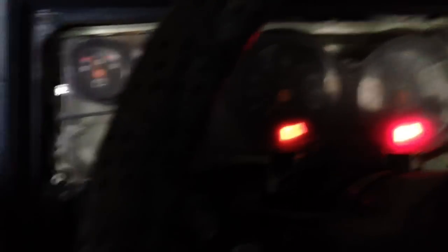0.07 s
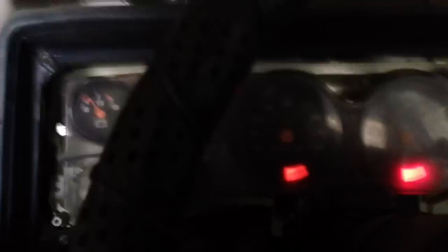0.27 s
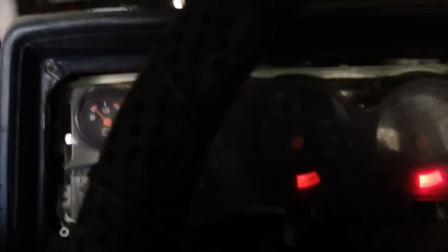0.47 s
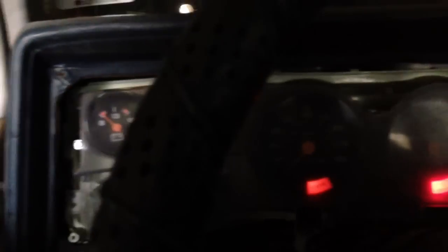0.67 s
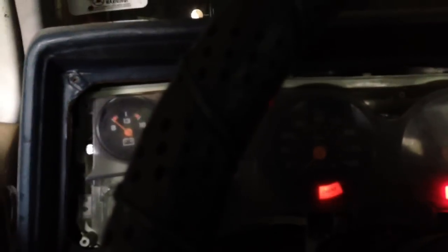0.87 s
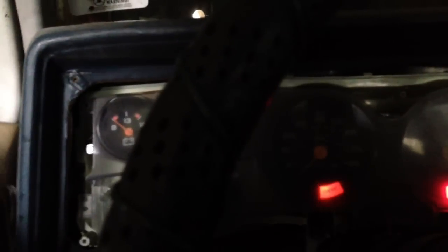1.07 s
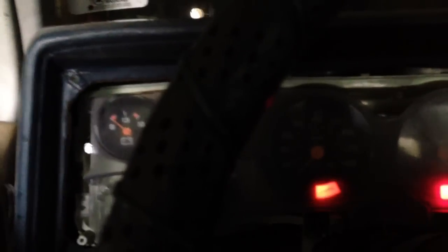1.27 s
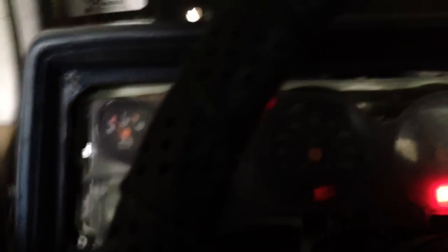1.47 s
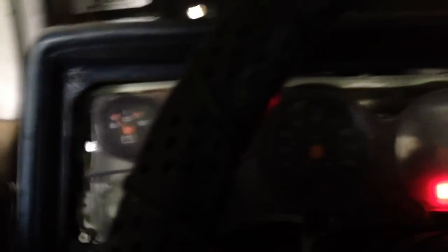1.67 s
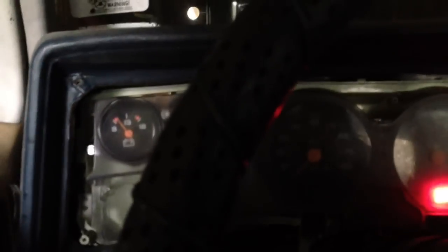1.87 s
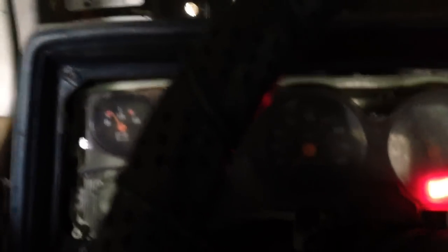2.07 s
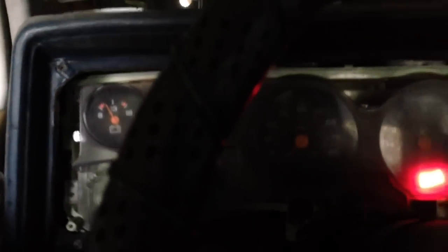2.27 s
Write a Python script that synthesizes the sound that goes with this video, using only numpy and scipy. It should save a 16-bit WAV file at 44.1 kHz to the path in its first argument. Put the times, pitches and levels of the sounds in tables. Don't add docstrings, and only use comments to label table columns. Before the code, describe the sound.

A car starter cranks a large engine, heard inside the cabin. Faint key clicks at 0.06-0.15 s end in a sharp snap. From 0.2 to 1.45 s, harsh ringing gear grind surges irregularly, with low hum, clangs and short groans, hardest near 1.0 and 1.36 s. The engine catches around 1.5 s, flares at 1.8-1.95 s with exhaust boom, intake hiss and panel buzz, then sags quieter. Dry, close, little bass.

```python
import sys
import numpy as np
from scipy import signal
from scipy.fft import rfft, irfft, next_fast_len
from scipy.io import wavfile
from scipy.ndimage import uniform_filter1d, map_coordinates

SR = 44100
rng = np.random.default_rng(int(sys.argv[2]) if len(sys.argv) > 2 else 0)


def materialize(psi):
    bounded = np.clip(np.atleast_2d(psi).T, -1, 1)
    quanta = np.round(bounded * 32767).astype(np.int16)
    wavfile.write(sys.argv[1], SR, quanta)


def nominal_scale(level):
    x = np.asarray(level, float) / 20
    return 10 ** x


N = 101430

# frequency in Hz, level in dB.
CABIN_AIR = [(35, -58), (60, -31), (100, -2), (145, 7), (976, -30), (1070, -18), (1910, -20), (15500, -31)]
# start in seconds, peak in dB, ring in Hz, crack in dB, 60 dB decay in seconds.
KEY_CLICKS = [
    (.059, -47, 3100, -2, .015),
    (.078, -45.5, 1700, 3.5, 0.083),
    (.083, -52, 3180, -6, .05),
    (.099, -30.5, 797, -17, 0.073),
    (.104, -36, 1820, -11, 0.029),
    (.125, -38, 2180, 6, 0.06),
    (.135, -20, 4000, 7.5, 0.018),
    (.138, -20, 796, -20, 0.034),
    (.151, -44.5, 5720, 16, 0.038),
]
# peak in seconds, level in dB, then the rise and the fall,
# each in seconds for 20 dB.
STROKES = [(.22, -30, .03, .06), (0.239, -20.5, 0.027, 0.16), (.32, -12, 0.12, 0.14),
           (.44, -16.5, 0.15, 0.28), (0.539, -14.5, 0.77, 0.19), (0.72, -12.5, 0.19, 0.18),
           (.88, -12.5, 0.14, 0.15), (0.992, -9.5, 0.0081, 0.15), (1.09, -15, .015, 0.085),
           (1.135, -12.5, 0.11, 0.098), (1.268, -21.5, 0.065, 0.038), (1.362, -10, 0.0089, 0.076),
           (1.469, -17.5, 0.14, 0.075)]
# frequency in Hz, width in Hz, level in dB.
FLYWHEEL_MODES = [(1333, 28, -8), (1776, 84, 0), (1902, 69, 4.5), (2061, 48, 1), (2223, 70, -2.5),
                  (2570, 53, -5.5), (2720, 73, -0.5), (3220, 45, -6), (3743, 70, 1.5), (4490, 89, -2),
                  (4820, 93, -2), (5270, 49, -5), (5750, 55, -3), (6380, 76, -5)]
# frequency in Hz, level in dB.
SCRAPE_SPECTRUM = [(150, -60), (350, -17), (750, -13), (1300, -8), (2500, -2.5), (5530, -3.5),
                   (11300, -20.5), (15500, -33)]
# frequency in Hz, width in Hz, level in dB.
BODY_MODES = [(175, 97, -1), (290, 140, -1), (483, 66, -0.5), (675, 140, -9.5)]
# time in seconds, pitch in Hz, level in dB.
ARMATURE = [
    (.23, 230, -35),
    (.255, 267, -40.5),
    (0.298, 175, -24),
    (.345, 192, -42.5),
    (.41, 225.7, -37),
    (0.519, 263, -32),
    (.565, 177, -24),
    (.605, 169.7, -28.5),
    (0.639, 175, -24),
    (0.689, 189, -45),
]
# centre in seconds, length in seconds, pitch in Hz,
# level in dB.
CLANGS = [(.238, 0.013, 6100, -30), (.238, 0.015, 7200, -32), (.3, 0.05, 1700, -25), (.312, .02, 4585, -21),
          (.31, .04, 4950, -24), (.33, .015, 3850, -22), (.335, .025, 2660, -17), (.355, 0.02, 2640, -17),
          (.355, .02, 2080, -22), (.37, .02, 2230, -22), (.385, .025, 2620, -20), (.41, .04, 1350, -27),
          (.42, .05, 5270, -23), (.445, .03, 2640, -23), (.47, .04, 2070, -23), (.5, .04, 4950, -23),
          (.52, .03, 1850, -22), (.57, .04, 2600, -22), (.61, .05, 3720, -24), (.625, .025, 1354, -27),
          (.688, .02, 1860, -21), (.7, .03, 4990, -23), (.72, .025, 4250, -22), (.745, .035, 3246, -20),
          (.755, .03, 2580, -22), (.87, .035, 4713, -23), (.9, .03, 2685, -23), (.905, .02, 5076, -22),
          (.992, 0.017, 1745, -18), (1.0, 0.025, 1350, -23), (1.002, 0.015, 3243, -17),
          (1.005, .035, 3745, -20), (1.01, .025, 2075, -21), (1.005, .02, 2600, -19),
          (1.025, 0.015, 2654, -14), (1.053, .015, 3740, -22), (1.058, 0.025, 2680, -19),
          (1.11, 0.03, 2670, -20), (1.122, .015, 1745, -19), (1.14, 0.032, 2060, -17),
          (1.165, 0.035, 1620, -24), (1.362, 0.025, 1740, -17), (1.372, .03, 3240, -16),
          (1.37, .015, 4430, -20), (1.39, 0.035, 2680, -17)]
# centre in seconds, length in seconds, pitch in Hz,
# level in dB.
GROANS = [(.725, 0.038, 299, -31), (0.738, 0.049, 515, -31), (0.763, 0.026, 200, -28), (.81, .03, 215, -31),
          (0.87, 0.018, 330, -22.5), (.885, 0.055, 477, -34), (.89, 0.036, 677, -32),
          (0.916, 0.019, 294, -24), (.93, 0.047, 573, -35), (.995, 0.04, 290, -34.5),
          (1.0, 0.038, 466, -31), (1.012, 0.025, 191, -33.5), (1.12, 0.042, 164, -34.5),
          (1.168, 0.067, 333, -32.5), (1.29, 0.05, 85, -42), (.25, 0.022, 491, -31),
          (.5, 0.032, 517, -32.5), (.62, 0.047, 489.5, -33)]
# time in seconds, firings per second, effort in dB, share of clean boom in dB.
ENGINE_COURSE = [
    (1.197, 113, -53, -3),
    (1.5, 65.3, -32.5, -27.5),
    (1.719, 73, -28, -1.5),
    (1.815, 79, -17.5, 2.5),
    (1.889, 95, -17.5, -15),
    (1.964, 92, -22.5, -19),
    (1.998, 94, -28, -7),
    (2.12, 88, -33, -2),
    (2.3, 72, -37, 3.5),
]
# frequency in Hz, width in Hz, level in dB.
EXHAUST_MODES = [(85, 91, -7), (167, 70, 1), (290, 142, -8), (455, 16, -1), (594, 280, -17.5),
                 (922, 33, -12), (1053, 37, -15.5)]
# frequency in Hz, level in dB.
VALVE_SPECTRUM = [(350, -35), (600, -11), (1120, -13), (1640, -9.5), (2570, -13.5), (6000, -19),
                  (15500, -49)]
# frequency in Hz, width in Hz, level in dB.
PANEL_MODES = [(1540, 136, -15), (2194, 79, 1.5), (2530, 190, 2.5), (2844, 84, 4)]
# frequency in Hz, level in dB.
INTAKE_SPECTRUM = [(590, -4.5), (1000, -20), (1690, -11), (2280, -8.5), (3260, -9.5), (12900, -19),
                   (15500, -24.5)]
# time in seconds, level in dB.
THROTTLE = [
    (1.45, -21),
    (1.62, -7.5),
    (1.66, -11),
    (1.755, -3.5),
    (1.935, -2.5),
    (2.0, -21.5),
    (2.3, -30),
]
# centre in seconds, length in seconds, pitch in Hz, level in dB.
BUZZES = [(1.65, 0.077, 1050, -38), (1.646, .016, 2251, -32), (1.648, .016, 2581, -36),
          (1.668, 0.02, 2291, -31), (1.69, 0.04, 2471, -39), (1.775, 0.025, 2781, -33),
          (1.795, .045, 2276, -29), (1.79, .02, 2601, -32), (1.82, .03, 2501, -33),
          (1.818, .015, 2151, -32), (1.85, 0.21, 1050, -36), (1.87, .04, 2251, -32),
          (1.862, .04, 2850, -27), (1.892, 0.05, 2820, -25), (1.9, .02, 2257, -32),
          (1.935, .035, 2741, -28), (1.955, .02, 2151, -34), (1.965, 0.04, 2840, -29),
          (1.88, 0.023, 1541, -34), (2.025, .02, 2881, -38)]


def unit(x):
    return x / np.sqrt(np.mean(x ** 2) + 1e-20)


def clock():
    return np.arange(N) / SR


def wobble(rate, size=N):
    knots = rng.standard_normal(int(N * rate / SR) + 4)
    return map_coordinates(knots, [np.arange(size) * rate / SR])


def filtered(x, response):
    m = next_fast_len(N + SR // 2)
    return irfft(rfft(x, m) * response(np.fft.rfftfreq(m, 1 / SR)), m)[:N]


def coloured(x, points):
    f, db = np.transpose(points)
    return unit(filtered(x, lambda hz: nominal_scale(np.interp(np.log(hz + 1), np.log(f), db, -120, -120))))


def resonant(x, peaks):
    def response(f):
        total = 0
        for k, (centre, width, db) in enumerate(peaks):
            mode = 1j * f * width / (centre * centre - f * f + 1j * f * width)
            total = total + (-1) ** k * nominal_scale(db) * mode
        return total
    return unit(filtered(x, response))


def wandering(x, peaks):
    total = np.zeros(N)
    for hz, width, db in peaks:
        drift_db = 2 * wobble(17.82)
        total += nominal_scale(db + drift_db) * resonant(x, [(hz, width, db)])
    return unit(total)


def patchy(depth_db):
    z = signal.stft(rng.standard_normal(N + 512), nperseg=256)[2]
    field = uniform_filter1d(uniform_filter1d(rng.standard_normal(z.shape), 4, 0), 8, 1)
    return signal.istft(z * nominal_scale(depth_db * unit(field)), nperseg=256)[1][:N]


def bursts(rows, rough, shakes, lead, sag):
    out = np.zeros(N + SR)
    t = np.arange(SR // 2) / SR - 1 / 4
    for s, length, hz, db in rows:
        bell_db = -34 * (t / np.where(t < 0, lead * length, length)) ** 2
        tone = np.sin(2 * np.pi * hz * t * (1 - sag * t / 2) + rough * wobble(shakes, size=len(t)))
        flutter_db = 3.9 * rough * wobble(shakes, size=len(t))
        out[round(s * SR) + SR // 4:][:len(t)] += nominal_scale(db + 4 + flutter_db + bell_db) * tone
    return out[SR // 2:][:N]


def cabin_air():
    return nominal_scale(-53.5) * coloured(patchy(depth_db=1.6), CABIN_AIR)


def key():
    rise_s, ring_longer, dull_hz = 0.00024, 0.97, 5860
    out = np.zeros(N + SR)
    t = np.arange(SR // 10) / SR
    for s, db, hz, crack_db, t60 in KEY_CLICKS:
        unsteady = np.cumsum(0.11 * rng.standard_normal(len(t)))
        ring = nominal_scale(-60 * t / (t60 * ring_longer)) * np.sin(2 * np.pi * hz * t + unsteady)
        crack = nominal_scale(crack_db - 4.0 - 60 * t / t60) * rng.standard_normal(len(t))
        out[round(s * SR):][:len(t)] += nominal_scale(db) * (ring + crack) * (1 - np.exp(-t / rise_s))
    return filtered(out[:N], lambda hz: 1j * hz / (750 + 1j * hz) / (1 + 1j * hz / dull_hz))


def starter_load():
    stroke_round, idle_grind_db = 1.37, -28.5
    engage_s, engage_rise_s = 0.207, 0.014
    touch_db, mesh_s, mesh_rise_s = -12, 0.229, 0.008
    t = clock()
    power = np.zeros(N)
    for s, db, rise, fall in STROKES:
        away = np.where(t < s, (s - t) / rise, (t - s) / fall).clip(0)
        power += nominal_scale(2 * (db - 20 * away ** stroke_round))
    engaged = 1. * ((t > STROKES[1][0]) & (t < STROKES[-1][0]))
    engaged = uniform_filter1d(engaged, SR // 50).clip(0)
    load = np.sqrt(power + engaged * nominal_scale(2 * idle_grind_db))
    load = load * ((t - engage_s) / engage_rise_s).clip(0, 1)
    return load * nominal_scale(touch_db * (1 - (t - mesh_s) / mesh_rise_s).clip(0, 1))


def gear_grind(load):
    teeth_per_s, tooth_scatter_db, ring_db, scrape_db = 1300, 4, -10.5, -3
    draw = rng.random((3, N))
    strength = nominal_scale(1.9 * tooth_scatter_db * draw[1]) * np.sign(draw[2] - .5)
    teeth = (draw[0] < teeth_per_s / SR) * strength
    blows = load * (unit(teeth) + 0.66 * patchy(depth_db=1.0))
    ring = nominal_scale(ring_db) * wandering(blows, FLYWHEEL_MODES)
    friction = load * patchy(depth_db=1.0) + 0.53 * blows
    scrape = nominal_scale(scrape_db) * coloured(friction, SCRAPE_SPECTRUM)
    return np.sqrt(np.mean(blows ** 2)) * (ring + scrape)


def body_rumble(load):
    body_db, follows = -34.5, 0.55
    shaken = resonant(resonant(patchy(depth_db=1), BODY_MODES), BODY_MODES)
    return nominal_scale(body_db) * (load / load.max() * 2) ** follows * shaken


def armature_hum():
    t = clock()
    s, hz, db = np.transpose(ARMATURE)
    level_db = np.interp(t, s, db + 3.5, -120, -120) + 1.1 * wobble(31.6)
    phase = 2 * np.pi * np.cumsum(np.interp(t, s, hz)) / SR
    return nominal_scale(level_db) * np.sin(phase + 0.35 * wobble(24.6))


def tooth_clangs():
    return nominal_scale(-0.5) * bursts(CLANGS, rough=0.6, shakes=120, lead=0.83, sag=0)


def housing_groans():
    return bursts(GROANS, rough=0.46, shakes=40, lead=0.86, sag=2.5)


def starter():
    load = starter_load()
    return gear_grind(load) + body_rumble(load) + armature_hum() + tooth_clangs() + housing_groans()


def firings(turns):
    jitter, scatter_db = 0.2185, 1.5
    at = np.flatnonzero(np.diff(np.floor(turns + jitter * wobble(50))) > 0)
    fire = np.zeros(N)
    fire[at] = nominal_scale(scatter_db * rng.standard_normal(len(at)))
    gate = filtered(fire, lambda hz: 1 / (1 + 1j * hz / 40))
    return unit(fire), unit(gate.clip(0))


def exhaust(turns, fire, gate, clean_db):
    octave_db, roar_db = -7, 7.5
    roar = nominal_scale(roar_db) * (0.69 + 0.63 * gate) * rng.standard_normal(N)
    pipe = resonant(fire + roar, EXHAUST_MODES)
    octave = nominal_scale(octave_db + 2.9 * wobble(15)) * np.sin(4 * np.pi * turns)
    boom = (np.sin(2 * np.pi * turns) + octave) * np.sqrt(2)
    return pipe + nominal_scale(clean_db + 1.1 * wobble(10.9)) * boom


def valve_gear(below_peak_db):
    return nominal_scale(-31.5 + 0.58 * below_peak_db) * coloured(patchy(depth_db=2.0), VALVE_SPECTRUM)


def panel_rattle(below_peak_db, gate):
    level_db = -26.5 + 1.36 * below_peak_db + 1.8 * wobble(24.45)
    shake = nominal_scale(level_db) * (0.86 + 0.73 * gate) * rng.standard_normal(N)
    return np.sqrt(np.mean(shake ** 2)) * resonant(shake, PANEL_MODES)


def intake(gate):
    level_db = -24.5 + np.interp(clock(), *np.transpose(THROTTLE), -90) + wobble(12)
    return nominal_scale(level_db) * (0.79 + 0.24 * gate) * coloured(patchy(depth_db=0.5), INTAKE_SPECTRUM)


def panel_buzzes():
    return nominal_scale(0.5) * bursts(BUZZES, rough=0.55, shakes=160, lead=1.0, sag=0)


def engine():
    t = clock()
    s, rate, level, clean = np.transpose(ENGINE_COURSE)
    turns = np.cumsum(np.interp(t, s, rate)) / SR
    effort_db = np.interp(t, np.r_[s[0] - .2, s], np.r_[-90, level])
    below_peak_db = effort_db - level.max()
    fire, gate = firings(turns)
    out = nominal_scale(effort_db) * exhaust(turns, fire, gate, np.interp(t, s, clean))
    out = out + valve_gear(below_peak_db) + panel_rattle(below_peak_db, gate)
    return out + intake(gate) + panel_buzzes()


def cabin(x):
    t60_s, room_db = 0.13, -10
    t = np.arange(SR // 5) / SR
    tail = rng.standard_normal(len(t)) * nominal_scale(-60 * t / t60_s)
    wet = signal.fftconvolve(x, tail / np.linalg.norm(tail))[:N]
    return x + nominal_scale(room_db) * filtered(wet, lambda hz: (1j * hz / (600 + 1j * hz)) ** 2)


def scene():
    return (cabin(key() + starter() + engine()) + cabin_air())[None]


def roll_off(x):
    return signal.sosfilt(signal.butter(12, 15350, fs=SR, output="sos"), x)


def record(dry):
    low_hz, top_hz = 54.7, 15350
    x = dry[0] / (1 + np.abs(dry[0]) ** 8) ** (1 / 8)
    x = filtered(x, lambda hz: (1j * hz / (low_hz + 1j * hz)) ** 4 * (hz < top_hz))
    return roll_off(x[None])


dry = scene()
out = record(dry)
materialize(out)
```